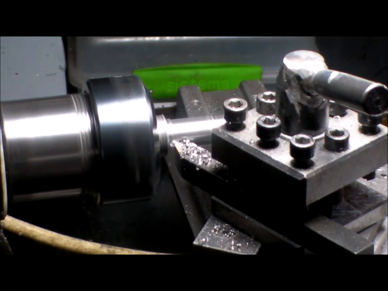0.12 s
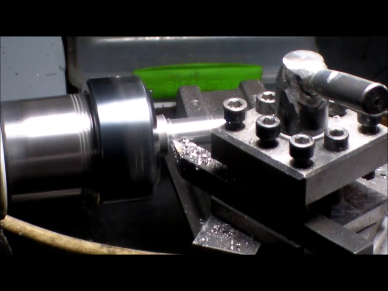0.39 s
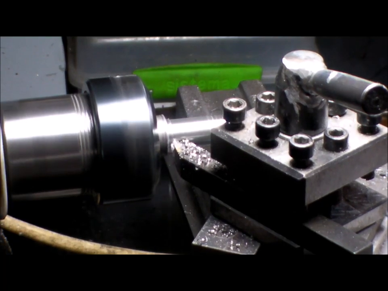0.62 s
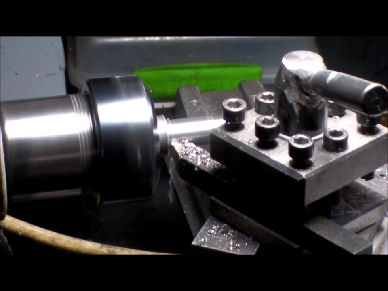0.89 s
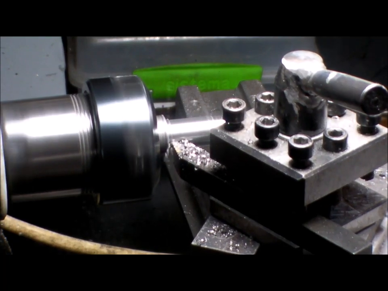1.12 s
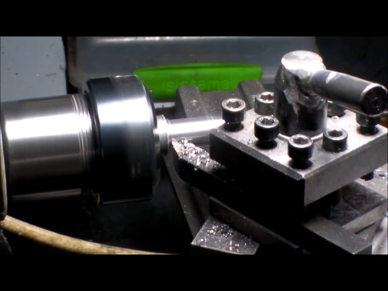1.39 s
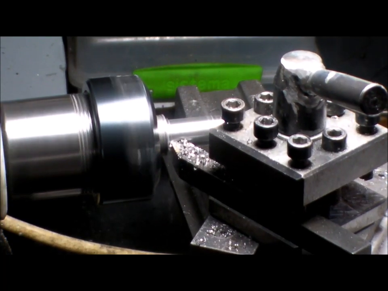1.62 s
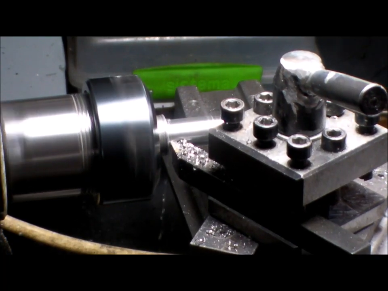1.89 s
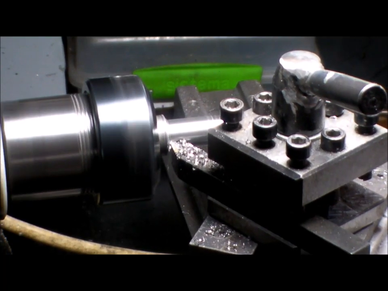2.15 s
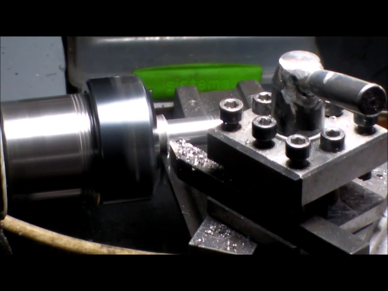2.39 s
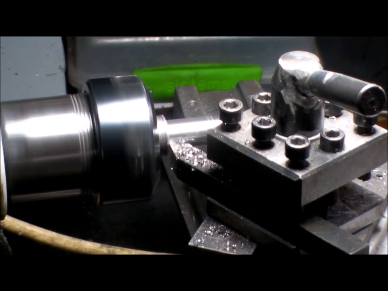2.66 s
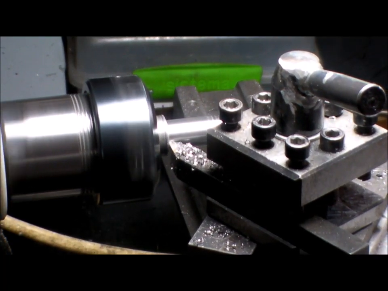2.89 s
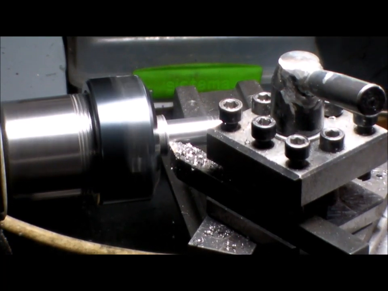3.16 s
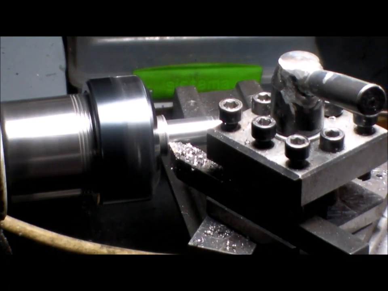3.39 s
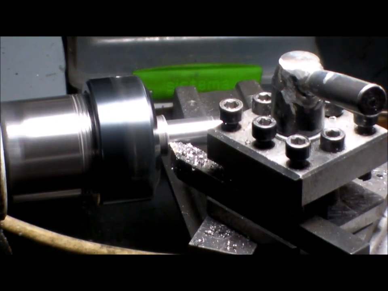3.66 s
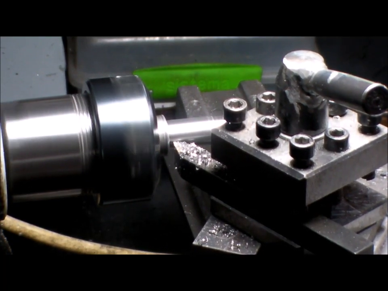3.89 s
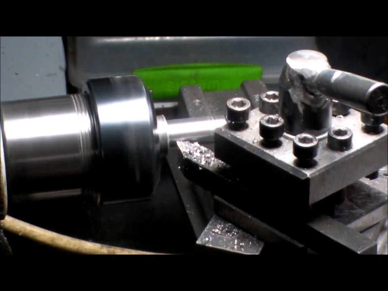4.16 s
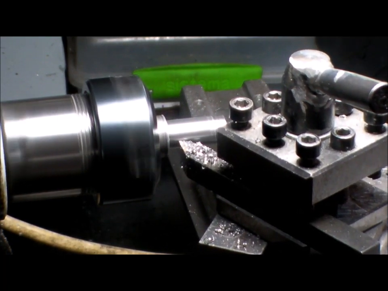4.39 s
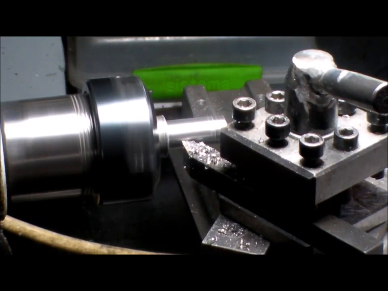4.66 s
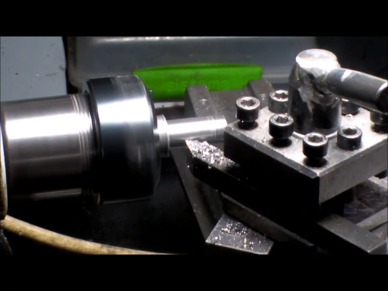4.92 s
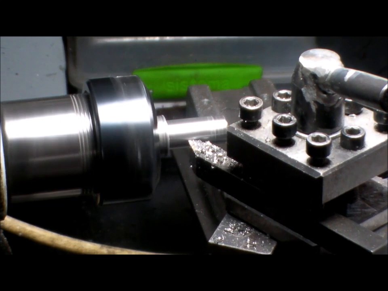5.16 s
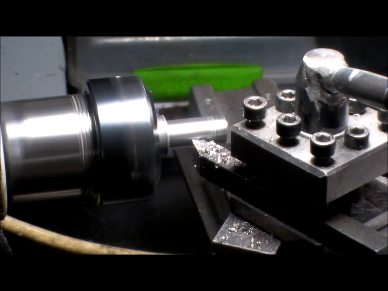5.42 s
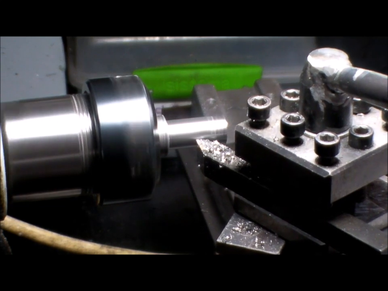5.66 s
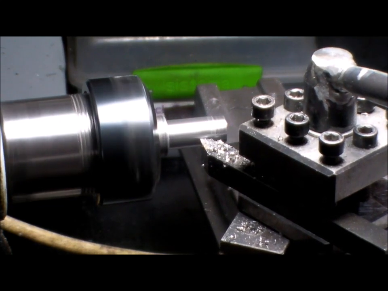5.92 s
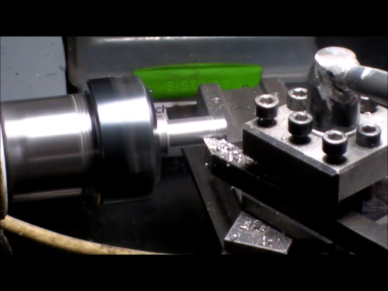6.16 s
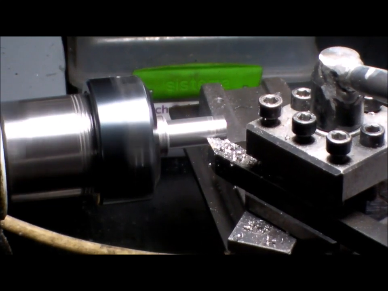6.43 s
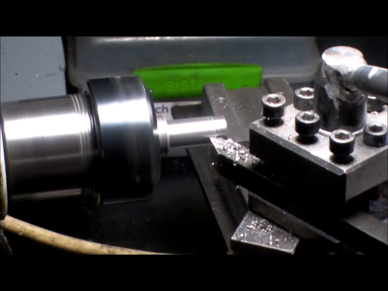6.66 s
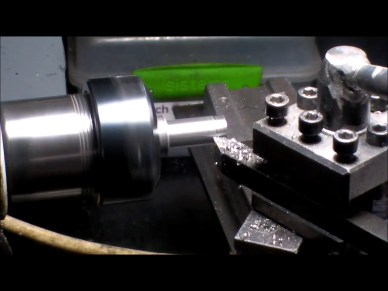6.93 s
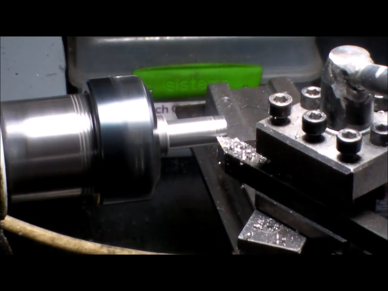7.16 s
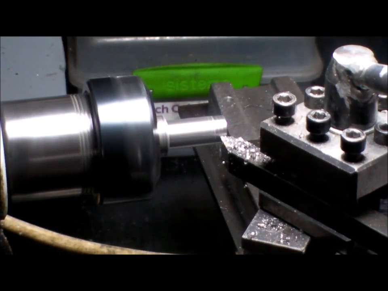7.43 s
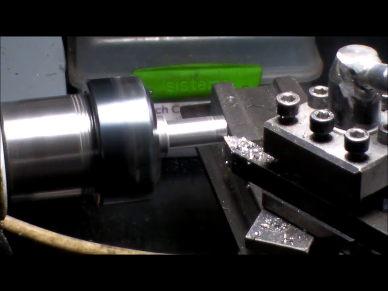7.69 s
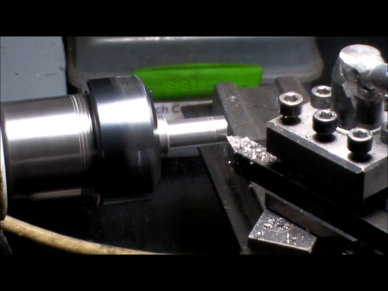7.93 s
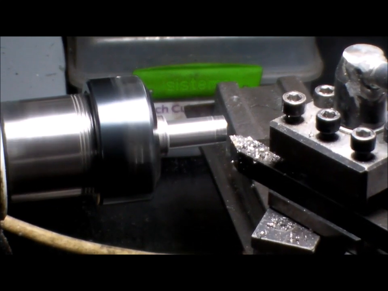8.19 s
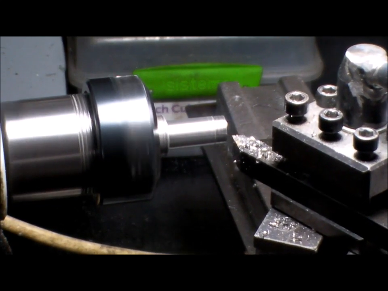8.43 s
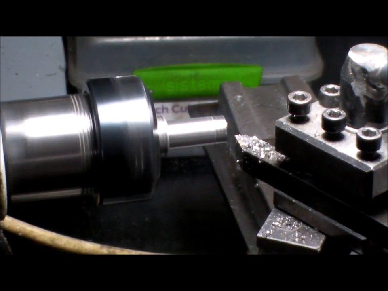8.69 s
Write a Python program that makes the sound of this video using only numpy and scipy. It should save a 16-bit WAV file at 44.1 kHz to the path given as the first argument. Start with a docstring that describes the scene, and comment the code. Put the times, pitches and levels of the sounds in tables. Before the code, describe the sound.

Close-up lathe drone with whining gears, rattling casing and squeaky bearings; a brief chattering cut, free spinning, a tiny gap, then half-speed lower running.

```python
"""Small metal lathe, close stereo microphone

Spindle and mains hum and gear whine are sums of sines; casing rattle, bed rumble and bearing hiss are
shaped noise, the hiss swelling once a turn; the bearings squeak and tick in short decaying sines.
The tool cuts in torn noise, squeals and judders as it leaves the shaft, and the spindle idles.
After a short silence the same machine is played at half speed, an octave lower."""
import sys
import numpy as np
from scipy import signal
from scipy.fft import rfft, irfft, next_fast_len
from scipy.io import wavfile
from scipy.ndimage import uniform_filter1d, map_coordinates

SR = 44100
rng = np.random.default_rng(int(sys.argv[2]) if len(sys.argv) > 2 else 0)


def transcribe(u):
    """Save the signal u as a 16-bit wav file named by the first command-line argument.

    u: samples, shape (n,) or (channels, n), limited to [-1, 1]; the rate is SR.
    q: integer samples, one column per channel.
    """
    v = np.clip(np.atleast_2d(u).T, -1, 1)
    q = np.round(v * 32767).astype(np.int16)
    wavfile.write(sys.argv[1], SR, q)


def volts(x):
    """Linear amplitude factor 10**(x/20) for a level x in dB, scalar or array-like."""
    e = np.asarray(x, float) / 20
    return 10 ** e


N = 388521  # length (samples)

# Silence from STOP_S to RESUME_S; the machine then goes on from its own time RESUME_AT_S at SLOW speed
STOP_S, RESUME_S, RESUME_AT_S, SLOW = 7.5102, 7.5433, 7.533, 0.5
SLOW_DB, SLOW_HUM_DB = -0.16, 3.5  # level at half speed; extra there for the low hum
TOP_HZ = 15760  # upper band limit

# Spindle speed, changing with the load: time_s, speed_turns_per_s
SPINDLE_SPEED = [(0, 14.888), (3.3, 14.888), (3.5, 14.909), (9, 14.909)]
FIRST_TURN, GEAR_CONTACTS = 0.255, 66.357  # starting angle (turns); tooth contacts per spindle turn
# Spindle hum: multiple_of_spindle, level_db (rms)
SHAFT_TONES = [(7, -60), (8, -67.5), (9, -59.5), (10, -58), (12, -38.5), (14, -50.5)]
# Gear whine: multiple_of_mesh, level_db (rms)
MESH_TONES = [(1, -42), (2, -54), (3, -54.5)]
# Motor magnetics: multiple_of_mains, level_db (rms)
MAINS_TONES = [(4, -47), (16, -39.5)]
MAINS_HZ = 49.98
HUM_PHASE_GAP_RAD = 0.035  # a slight phase difference between the ports in the hum

# Rumble of bed and bench: frequency_hz, level_db (per Hz)
BED_RUMBLE = [(25, -109), (60, -83.5), (110, -72), (190, -65), (215, -68), (270, -74), (440, -72),
              (600, -76.5), (1100, -68.5), (1800, -74.5), (3500, -76), (6000, -87), (9000, -100)]
# Casing modes: centre_hz, width_hz, level_db (per Hz)
CASING_MODES = [(725.5, 91, -60), (860, 70.5, -55), (1102, 100, -67.5), (1170, 55, -63), (1373, 41, -63.5),
                (1536, 41, -71.5), (1680, 28, -68), (1970, 104, -70), (2296, 37, -66.5), (2460, 38, -63),
                (2552, 39, -71), (2658, 38, -67), (2995, 88, -72), (3190, 120, -72), (3754, 79, -69.5),
                (4020, 51, -68.5), (4410, 25, -74)]

# Bearing hiss in three zones: frequency_hz, level_db (per Hz)
HISS_LOW_ZONE = [(2500, -92), (4500, -77), (5700, -78.5), (6600, -74.5), (7200, -76.5), (8500, -77.5),
                 (10000, -78), (12000, -85)]
HISS_MID_ZONE = [(8000, -101), (10200, -81.5), (11400, -74.5), (12000, -76), (12500, -74.5), (13400, -77),
                 (14200, -77.5), (16000, -86.5), (19000, -95)]
HISS_TOP_ZONE = [(14000, -94), (17000, -81), (19500, -82), (22500, -76), (25000, -73), (27000, -77),
                 (29000, -79), (33000, -98)]
# Swell of each zone with the spindle angle: multiple_of_spindle, depth_db, phase_rad
SWELL_LOW = [(1, 0.7, -2), (2, .5, 0.3)]
SWELL_MID = [(1, 2.3, -0.14), (2, 1.8, -2.5), (3, 1.1, -1.4)]
SWELL_TOP = [(1, 3.9, -.5)]
# Chuck rings excited by the bearings: centre_hz, width_hz, level_db (relative to CHUCK_DB)
CHUCK_RINGS = [(9800, 110, -4), (10700, 76, -1), (10850, 91, -1), (11400, 120, -2), (12000, 160, 0.5),
               (12500, 110, 1), (13000, 200, 0.5), (13520, 110, 4), (13850, 90, -2), (14350, 150, -5)]
CHUCK_DB, UPPER_HZ = -76, 12800  # ring level (per Hz); where the upper rings begin
# Course of the upper rings: machine_time_s, level_db
UPPER_RINGS = [(0, -5), (1.7, -4), (3.7, 3), (5.5, -1), (9, -5)]
# Squeaks of the bearing races: pitch_hz, scatter_hz, level_db (typical, before onset), angle_turns (crowding)
RACE_SQUEAKS = [(6600, 170, -37.5, .25), (7400, 430, -39, .05), (11270, 180, -43, 0.033),
                (12300, 270, -36, .97), (13100, 320, -31, .65), (23100, 500, -36, 0.13),
                (25200, 500, -34, .05)]

# Tool post modes under the cut, sounding at 0.98 of these pitches: centre_hz, width_hz, level_db (relative)
POST_MODES = [(414, 124, -9), (720, 55, -2), (870, 74, 3.5), (1290, 340, -10), (1680, 210, -10.5),
              (3000, 1440, -19), (6250, 3600, -22)]
# Squeal of the cutting edge, likewise at 0.98: centre_hz, width_hz, level_db (relative)
EDGE_MODES = [(2210, 130, 0), (2326, 140, -3)]
# Strong tool slips: start_s, level_db (before the ring's 4 dB trim)
STRONG_SLIPS = [(2.407, -17.5), (3.241, -16), (3.29, -18), (3.331, -28), (3.384, -13), (3.413, -9.5),
                (3.431, -12), (3.467, -13), (3.492, -15), (3.514, -16), (3.568, -9.5), (3.659, -14),
                (3.711, -14)]
# Tool shank modes: pitch_hz, level_db (relative), t60_s
SHANK_MODES = [(418, 0, 0.088), (704, -5, 0.096), (770, -5, 0.092), (849, 1, 0.1), (920, -11, 0.051),
               (1180, -8, 0.041)]
# The cut: a steady growl, a harder drag as the tool backs along the shoulder, then it lifts clear
GROWL_DB, DRAG_DB = -61.5, -54.5  # growl while feeding and while dragging (per Hz, POST_MODES on top)
DRAG_AT_S, DRAG_RISE_S, LIFT_AT_S, LIFT_DB_PER_S = 3.15, 0.08, 3.73, 400
SQUEAL_DB, SQUEAL_TOP_DB = -72, -62  # squeal while feeding and at its height (per Hz, EDGE_MODES on top)
SQUEAL_AT_S, SQUEAL_RISE_DB_PER_S, SQUEAL_FALL_DB_PER_S = 3.17, 20, 18  # height, swell before, fade after
SMALL_SLIPS, SMALL_SLIP_DB, SMALL_SLIP_SCATTER_DB = 14, -19, 2.5  # lesser slips strewn over the drag
# The shank's lowest mode rings strongly only while the tool is pressed sideways
PRESSED_FROM_S, PRESSED_TO_S = 3.23, 3.53
PRESSED_DB, FREE_DB = -10, -36  # offset of the lowest mode, pressed and free
LOW_HELD = 0.55  # share of a slip's dB that the lowest mode does not follow

# Sharp ticks of the bearings: start_s, level_db (before a 5 dB trim), pitch_hz
BEARING_TICKS = [(3.7183, -18, 13000), (5.9652, -20, 13000), (7.7397, -20, 12700), (7.7644, -21, 6030),
                 (7.8599, -19, 12900), (7.9572, -21.5, 3660), (8.294, -20, 6090), (8.3992, -18, 6080),
                 (8.7449, -18, 6600)]

# Stereo likeness: frequency_hz, left_right_likeness
LIKENESS = [(30, 0.94), (120, 0.99), (800, 0.98), (2200, .88), (5000, 0.63), (9000, .48), (12500, 0.22),
            (17000, 0.23), (27000, .55), (30000, .25)]
# Lead of the left port: frequency_hz, lead_rad
LEFT_LEAD = [(4000, .05), (8000, .35), (10500, .1), (11800, 1.2), (12500, -.5), (13100, .3), (13800, 2.1),
             (27000, 2.6)]
# Stereo balance: frequency_hz, left_over_right_db
BALANCE = [(300, -0.8), (5000, -0.5), (11000, -0.6), (13200, -6), (15500, -1), (18000, 4), (24000, -1.5)]


def along(points, hz):
    """Reads (Hz, value) points on a log frequency axis."""
    f, v = np.transpose(points)
    return np.interp(np.log(hz + 1), np.log(f + 1), v)


def wobble(clock, rate):
    """A smooth random curve, rate knots a machine second."""
    knots = rng.standard_normal(int(10 * rate) + 4)
    return map_coordinates(knots, [clock * rate])


def modes(table):
    """Causal response of (Hz, width Hz, dB) resonances, alternating in sign."""
    def response(f):
        total = 0
        for k, (centre, width, db) in enumerate(table):
            resonance = 1j * f * width / (centre ** 2 - f ** 2 + 1j * f * width)
            total = total + (-1) ** k * volts(db) * resonance
        return total
    return response


def shake(n, speed, patchy_db, spiky_db):
    """Two unit noises with patches of gain and sudden grains in common."""
    size = int(256 / speed)
    z = signal.stft(rng.standard_normal((2, n)), nperseg=size)[2]
    field = rng.standard_normal(z.shape[1:])
    for axis in (0, 1):
        field = uniform_filter1d(field, size=5, axis=axis)
    patchy = z * volts(patchy_db * field / field.std())
    pair = signal.istft(patchy, nperseg=size)[1][:, :n]
    grain = uniform_filter1d(rng.standard_normal(n), size=int(40 / speed))
    pair = pair * volts(spiky_db * grain / grain.std())
    return pair / pair.std()


def heard(pair, response, speed):
    """Colours a pair per Hz of machine frequency and spreads it over the microphone's two ports."""
    m = next_fast_len(pair.shape[1] + 8192)
    hz = np.fft.rfftfreq(m, speed / SR)
    a, b = rfft(pair, m) * response(hz) * np.sqrt(SR / 2 / speed)
    # mixing two independent noises at this angle gives the wanted likeness
    turn = np.arccos(np.clip(along(LIKENESS, hz), -1, 1)) / 2
    mid, side = a * np.cos(turn), b * np.sin(turn)
    tilt = volts(along(BALANCE, hz) / 2) * np.exp(0.5j * along(LEFT_LEAD, hz))
    return irfft([(mid + side) * tilt, (mid - side) / tilt], m)[:, :pair.shape[1]]


def hum(clock, turns, low_db):
    """Sines locked to spindle, gear mesh and mains, each wavering a little in level."""
    mains = MAINS_HZ * clock
    stacks = [(SHAFT_TONES, turns, low_db), (MESH_TONES, GEAR_CONTACTS * turns, 0),
              (MAINS_TONES[:1], mains, low_db), (MAINS_TONES[1:], mains, 0)]
    ports = np.array([[HUM_PHASE_GAP_RAD / 2], [-HUM_PHASE_GAP_RAD / 2]])
    out = 0
    for table, cycles, lift_db in stacks:
        for k, db in table:
            waver_db = 0.7 * wobble(clock, 3.5) + 1.23 * wobble(clock, 24)
            phase = 2 * np.pi * (round(k) * cycles + rng.random()) + ports
            out = out + volts(db + lift_db + waver_db) * np.sin(phase)
    return np.sqrt(2) * out  # rms to peak


def casing(clock, unsteady_db, speed):
    """Loose gears rattle the casing modes; the bed rumbles under them in slow lumps."""
    n = len(clock)
    rattle_db = 0.5 * unsteady_db + 1.24 * wobble(clock, 40)
    rattle = volts(rattle_db) * shake(n, speed, patchy_db=1.5, spiky_db=2.5)
    bed_db = 0.35 * unsteady_db + 0.83 * wobble(clock, 9)
    bed = volts(bed_db) * shake(n, speed, patchy_db=1.26, spiky_db=0.7)
    rumble = heard(bed, lambda hz: volts(along(BED_RUMBLE, hz)), speed)
    return heard(rattle, modes(CASING_MODES), speed) + rumble


def chuck(clock, drive_db, speed):
    """The bearing noise rings the chuck; its upper rings wax and wane slowly."""
    drive = volts(CHUCK_DB + drive_db) * shake(len(clock), speed, patchy_db=2.0, spiky_db=0.0)
    rings = modes(CHUCK_RINGS)
    lower = heard(drive, lambda hz: rings(hz) * (hz < UPPER_HZ), speed)
    upper = heard(drive, lambda hz: rings(hz) * (hz >= UPPER_HZ), speed)
    return lower + volts(np.interp(clock, *np.transpose(UPPER_RINGS))) * upper


def bearings(clock, turns, unsteady_db, speed):
    """Each zone of the hiss swells with the spindle angle, and the middle swell drives the chuck."""
    def swell(table):
        return sum(db * np.cos(2 * np.pi * round(k) * turns + rad) for k, db, rad in table)

    out = chuck(clock, 1.3 * swell(SWELL_MID) + unsteady_db, speed)
    zones = [(HISS_LOW_ZONE, SWELL_LOW), (HISS_MID_ZONE, SWELL_MID), (HISS_TOP_ZONE, SWELL_TOP)]
    for colour, table in zones:
        noise = shake(len(clock), speed, patchy_db=0.85, spiky_db=1.17)
        swelling = volts(swell(table) + unsteady_db) * noise
        out = out + heard(swelling, lambda hz: volts(along(colour, hz)), speed)
    return out


def squeaks(turns, speed):
    """A rough spot on each race squeaks three times a turn near its own angle, at very uneven strength."""
    out, t = np.zeros((2, len(turns) + 512)), np.arange(512) * speed / SR
    whole = np.repeat(np.arange(int(turns[0]) + 1, int(turns[-1])), repeats=3)
    for centre_hz, scatter_hz, db, angle in RACE_SQUEAKS:
        if centre_hz * speed > TOP_HZ:
            continue
        late, pitch, size, pan = rng.standard_normal((len(whole), 4)).T[..., None]
        start = np.interp(whole[:, None] + angle + 0.13 * late, turns, np.arange(len(turns))).astype(int)
        envelope = volts(db + 5.1 * size - 60 * t / 0.0098) * (1 - np.exp(-t / 0.0004))
        squeak = envelope * np.sin(2 * np.pi * (centre_hz + scatter_hz * pitch) * t)
        places = (start + np.arange(512)).ravel()
        for side, port in zip((0.5, -0.5), out):
            gain = volts(side * (along(BALANCE, centre_hz) + 5 * pan))
            if side < 0:
                gain = gain * np.sign(pan)  # the right port is inverted in about half of them
            port += np.bincount(places, (gain * squeak).ravel(), len(port))
    return out[:, :len(turns)]


def machine(clock, speed, low_db):
    """The running lathe over a stretch of machine time, played at a speed."""
    fine = np.arange(0, 9, 1 / SR)
    turns_per_s = np.interp(fine, *np.transpose(SPINDLE_SPEED))
    turns = np.interp(clock, fine, FIRST_TURN + np.cumsum(turns_per_s) / SR)
    # belt and load, felt in casing and bearing noise alike
    unsteady_db = 0.5 * wobble(clock, 8) + 0.35 * wobble(clock, 17) + 0.64 * wobble(clock, 80)
    out = hum(clock, turns, low_db) + casing(clock, unsteady_db, speed)
    return out + bearings(clock, turns, unsteady_db, speed) + squeaks(turns, speed)


def cut():
    """The edge tears metal unevenly, squeals and shakes the tool post; each slip rings the shank."""
    n = 4 * SR
    clock, t = np.arange(n) / SR, np.arange(SR // 5) / SR
    lifted_db = LIFT_DB_PER_S * np.maximum(clock - LIFT_AT_S, 0)
    growl_db = np.interp(clock, [DRAG_AT_S, DRAG_AT_S + DRAG_RISE_S], [GROWL_DB, DRAG_DB]) - lifted_db
    tearing = volts(0.85 * wobble(clock, 25.0)) * shake(n, 0.96, patchy_db=2.5, spiky_db=3)
    out = heard(volts(growl_db) * tearing, modes(POST_MODES), 0.98)

    away = clock - SQUEAL_AT_S
    swell_db = SQUEAL_TOP_DB + np.minimum(SQUEAL_RISE_DB_PER_S * away, -SQUEAL_FALL_DB_PER_S * away)
    squeal_db = np.maximum(swell_db, SQUEAL_DB) - lifted_db
    squeal = volts(squeal_db) * shake(n, 1, patchy_db=2.5, spiky_db=1.0)
    out += heard(squeal, modes(EDGE_MODES), 0.98)

    place = (np.arange(SMALL_SLIPS) + rng.random(SMALL_SLIPS)) / SMALL_SLIPS
    small_s = DRAG_AT_S + place * (LIFT_AT_S - DRAG_AT_S)
    small_db = rng.normal(SMALL_SLIP_DB, SMALL_SLIP_SCATTER_DB, SMALL_SLIPS)
    for s, db in [*STRONG_SLIPS, *zip(small_s, small_db)]:
        extras = rng.normal(0, 1.8, len(SHANK_MODES))
        pressed = PRESSED_FROM_S < s < PRESSED_TO_S
        extras[0] += (PRESSED_DB if pressed else FREE_DB) - LOW_HELD * db
        ring = 0
        for (hz, level, t60), extra in zip(SHANK_MODES, extras):
            detune = 1 + 0.014 * rng.standard_normal()
            cycles = hz * (s + detune * t)  # slips fall in step with the ringing shank
            ring = ring + volts(level + extra - 60 * t / t60) * np.sin(2 * np.pi * cycles)
        onset = 1 - np.exp(-t / 0.0044)
        out[:, round(s * SR):][:, :len(t)] += volts(db - 4.0) * onset * ring
    return np.pad(out, [(0, 0), (0, N - n)])


def bearing_ticks():
    """The bearings tick sharply: a short bright ring in a puff of noise."""
    out, t = np.zeros((2, N + SR)), np.arange(SR // 40) / SR
    for s, db, hz in BEARING_TICKS:
        puff = np.diff(rng.standard_normal((2, len(t) + 1))) * 0.34
        ring = 0.77 * np.sin(2 * np.pi * hz * t)
        out[:, round(s * SR):][:, :len(t)] += volts(db - 5 - 60 * t / 0.038) * (ring + puff)
    return out[:, :N]


def scene():
    """Full speed with the cut, silence, half speed; bearing ticks in both."""
    stop, resume = round(STOP_S * SR), round(RESUME_S * SR)
    out = cut() + bearing_ticks()
    out[:, :stop] += machine(np.arange(stop) / SR, 1, low_db=0)
    out[:, stop:resume] = 0
    since = np.arange(N - resume) / SR
    snap_db = 12 * np.exp(-since / 0.001)  # the sound returns with a small snap
    slow = machine(RESUME_AT_S + SLOW * since, SLOW, SLOW_HUM_DB)
    out[:, resume:] += volts(SLOW_DB + snap_db) * slow
    return out


def roll_off(x):
    """The treble ends steeply here."""
    return signal.sosfilt(signal.butter(12, 16580, fs=SR, output="sos"), x)


def record(dry):
    """Band-limits the mix and finishes it."""
    m = next_fast_len(N)
    passed = np.fft.rfftfreq(m, 1 / SR) < TOP_HZ
    narrow = irfft(rfft(dry, m) * passed, m)[:, :N]
    return roll_off(narrow)


dry = scene()
out = record(dry)
transcribe(out)
```